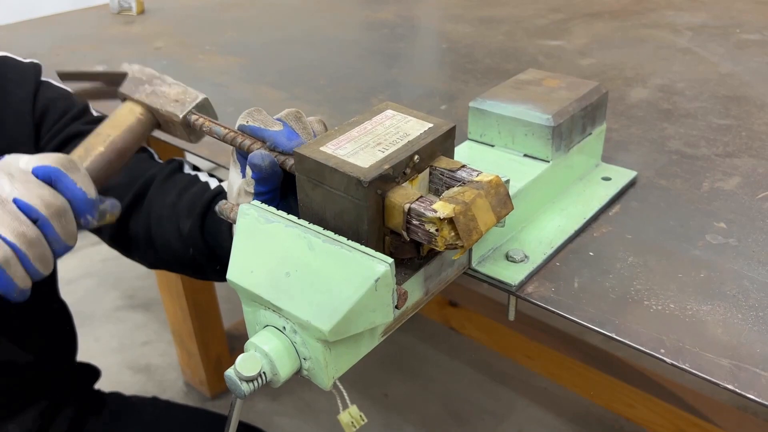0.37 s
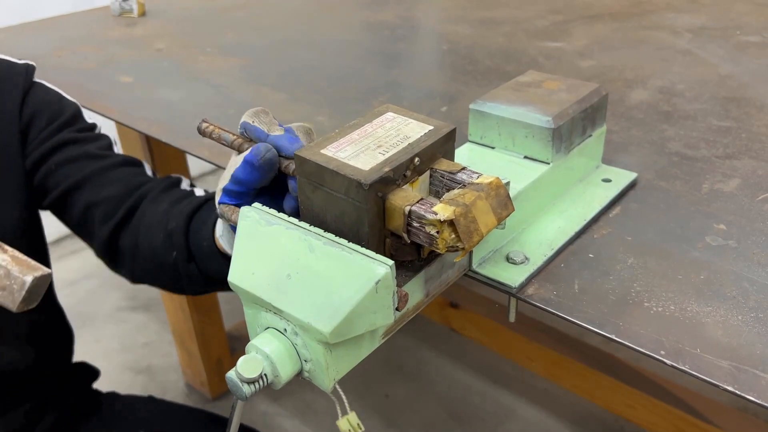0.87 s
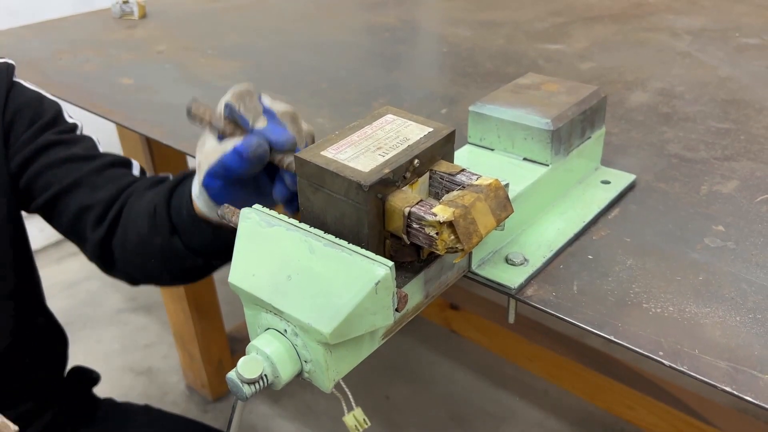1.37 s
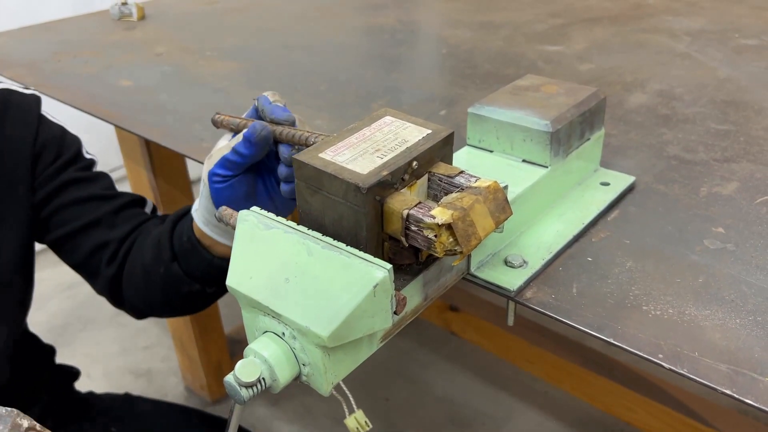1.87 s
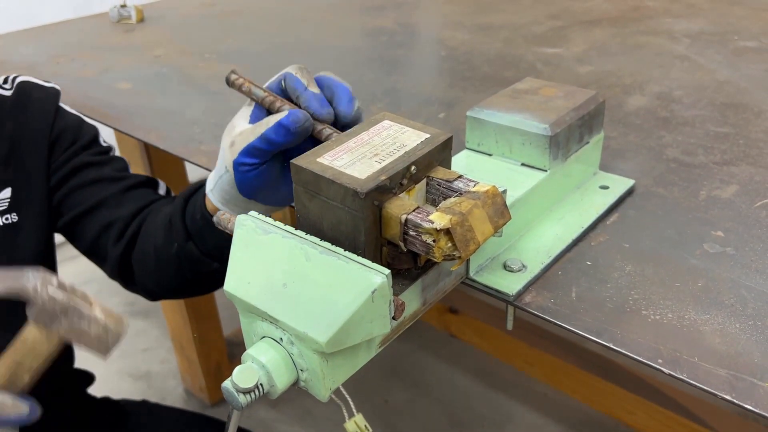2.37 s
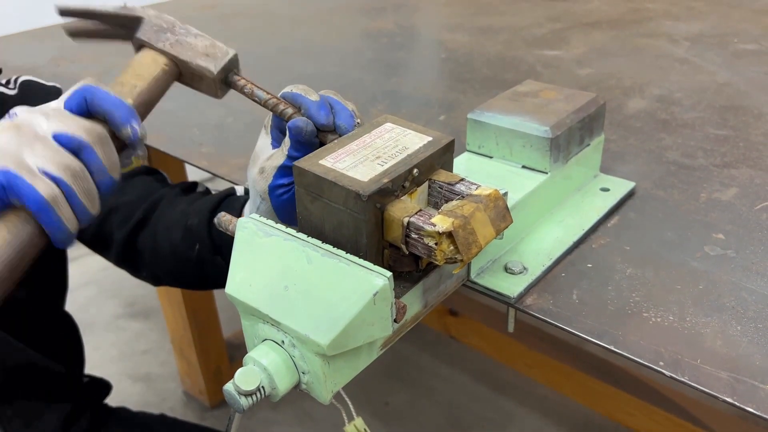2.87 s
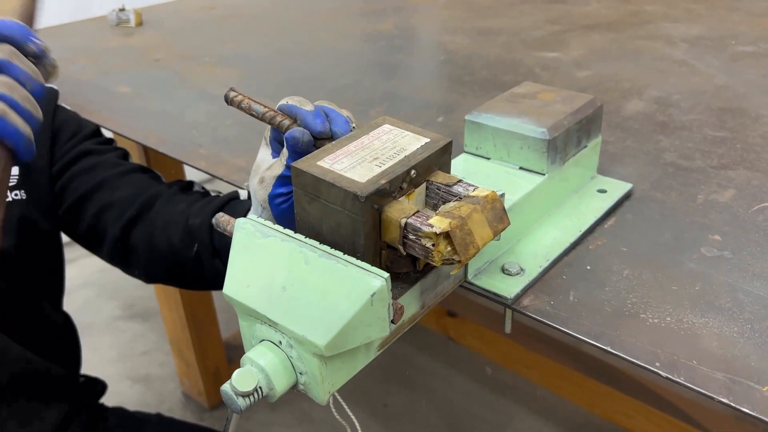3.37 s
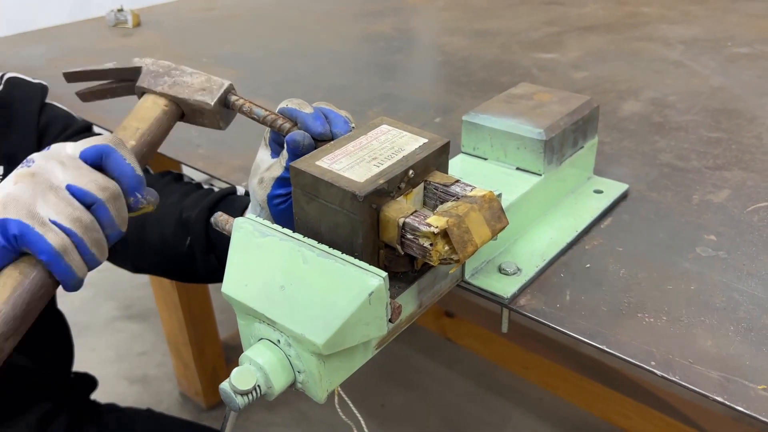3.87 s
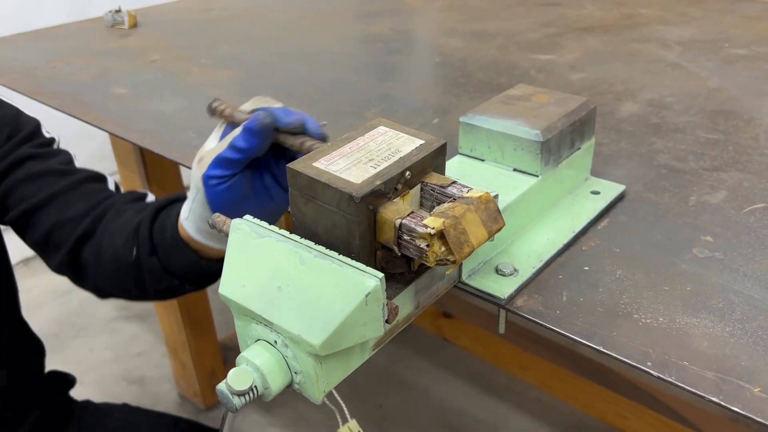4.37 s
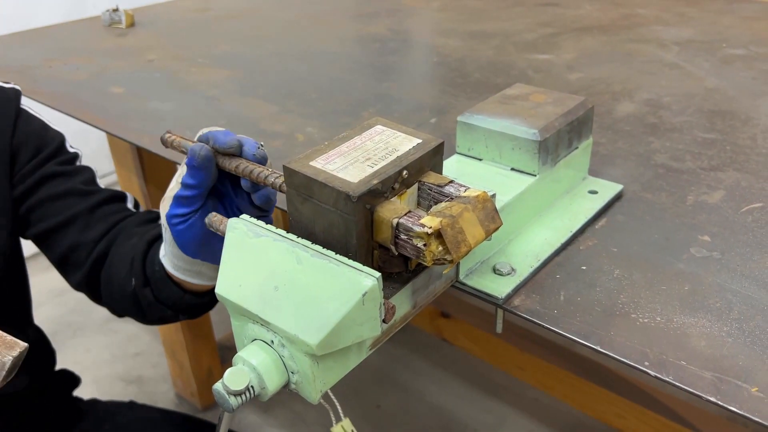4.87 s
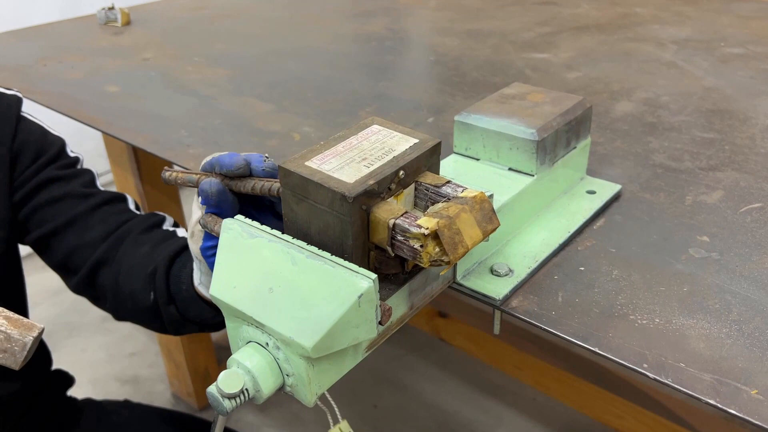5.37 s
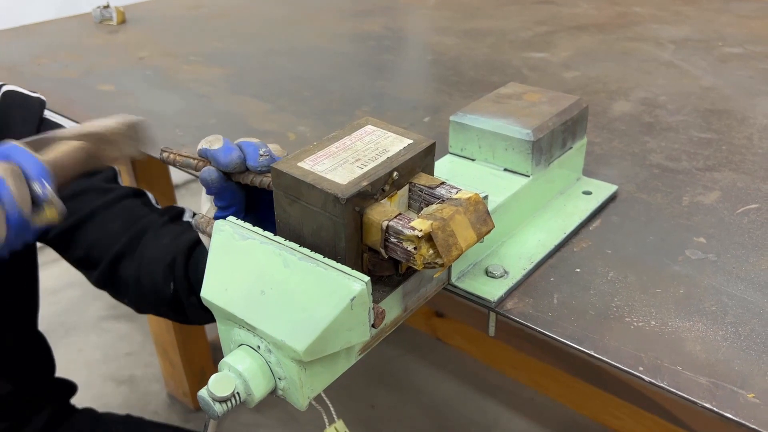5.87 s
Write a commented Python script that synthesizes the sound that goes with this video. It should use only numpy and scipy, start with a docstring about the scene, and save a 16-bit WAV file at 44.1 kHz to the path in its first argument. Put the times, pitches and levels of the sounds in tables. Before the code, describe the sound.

Sharp metallic hammer blows, five a second, ring through a workshop bench, pause for quiet handling knocks and rustles, then resume before one last strike.

```python
"""Hammer and steel rod at a vice

A hammer drives a steel rod into a part clamped in a vice on a sheet-steel bench, in bursts of quick blows.
Each blow cracks, rings rod and hammer head and booms through bench and workshop; between bursts a gloved
hand shifts the rod with small taps and rustles. Shaped noise makes hum, handling, boom, taps and cracks;
ringing noise bands make the rod, sines and fluttering noise the head. A wide stereo microphone with a
limiter listens."""
import sys
import numpy as np
from scipy import signal
from scipy.io import wavfile
from scipy.ndimage import uniform_filter1d

SR = 44100
rng = np.random.default_rng(int(sys.argv[2]) if len(sys.argv) > 2 else 0)


def master_out(mix):
    """Clip the mix to full scale and print it as 16-bit PCM to the path in sys.argv[1]."""
    frames = np.transpose(np.atleast_2d(mix))
    ceiling = np.clip(frames, -1, 1)
    pcm = np.round(ceiling * 32767).astype(np.int16)
    wavfile.write(sys.argv[1], SR, pcm)


def how_loud(loudness_db):
    """Turn decibels into a plain amplitude multiplier (0 dB gives 1, 20 dB gives 10)."""
    steps = np.asarray(loudness_db, float) / 20
    return 10 ** steps


N = 264159
LEAD = 8192   # samples run in before time zero
BAND_EDGES_HZ = 22 * 2 ** np.arange(0, 9.7, .4)
PRE_ECHO_S = 0.011   # growth time of the pre-echo, a noise smeared ahead of a hit


def rms_one(x):
    """Scales to unit rms."""
    return x / np.sqrt(np.mean(x ** 2) + 1e-20)


def at_hz(points, hz):
    """Reads a table along a log-frequency axis."""
    table_hz, values = np.transpose(points)
    return np.interp(np.log(hz), np.log(np.maximum(table_hz, 1)), values)


def colour(points, hz):
    """Gain of the band at hz, so that all bands of white noise together have unit rms."""
    centres_hz = np.sqrt(BAND_EDGES_HZ[1:] * BAND_EDGES_HZ[:-1])
    power = np.sum(how_loud(2 * at_hz(points, centres_hz)) * np.diff(BAND_EDGES_HZ)) / (SR / 2)
    return how_loud(at_hz(points, hz)) / np.sqrt(power)


def bands():
    """Yields (centre Hz, band of noise unrelated in the two channels, white level kept)."""
    white = rng.standard_normal((2, 2, N))
    for k, (low, high) in enumerate(zip(BAND_EDGES_HZ, BAND_EDGES_HZ[1:])):
        band = signal.butter(3, [low, high], "band", fs=SR, output="sos")
        yield np.sqrt(low * high), signal.sosfilt(band, white[k % 2])   # neighbours use different noise


def resonance(x, hz, width_hz):
    """Two-pole peak, gain 1 on top."""
    r = np.exp(-np.pi * width_hz / SR)
    poles = [1, -2 * r * np.cos(2 * np.pi * hz / SR), r * r]
    return signal.lfilter([(1 - r * r) / 2, 0, (r * r - 1) / 2], poles, x)


def twice_resonant(x, hz, width_hz):
    """Two equal peaks in series: steeper skirts."""
    return resonance(resonance(x, hz, width_hz), hz, width_hz)


def clicks(seconds, sizes):
    """One sample per event, with a run-in ahead of time zero."""
    train = np.full(N + LEAD, 1e-18)
    train[np.round(np.asarray(seconds) * SR).astype(int) + LEAD] = sizes
    return train


def dying(train, t60_s, rise_s):
    """Envelope that swells over the rise time and then dies away."""
    fall, rise = how_loud(-60 / (t60_s * SR)), np.exp(-1 / (rise_s * SR))
    return signal.lfilter([1 - rise], np.convolve([1, -fall], [1, -rise]), train)[LEAD:]


def pre_echo(train, level_db):
    """Envelope that grows towards each event and ends on it."""
    grow = signal.lfilter([1], [1, -np.exp(-1 / (PRE_ECHO_S * SR))], train[::-1])[::-1]
    return how_loud(level_db) * grow[LEAD:]


def patches(depth_db, per_s):
    """Gain that wanders at random; per_s up to 30."""
    knots = rng.standard_normal(round(N / SR * 30) + 2)
    return how_loud(depth_db * np.interp(np.arange(N) / SR * per_s, np.arange(len(knots)), knots))


def sides(db):
    """Left and right gain for a left-right difference."""
    return how_loud(np.array([db, -db]) / 2)


# spectrum of the workshop hum: (freq_hz, density_db_per_hz)
HUM = [(15, -30), (25, -3), (60, 3.5), (106, 4), (286, -11), (900, -13.5), (2630, -23), (4000, -33.5),
       (8800, -35.5), (11800, -47), (15000, -76.5)]


def workshop_hum(hz):
    """Steady low-heavy noise: its gain in the band at hz."""
    return colour(HUM, hz) * how_loud(-65)


# glove and sleeve moving between bursts: (time_s, shuffle_db, rustle_db)
HANDLING = [(0.95, -83.5, -98), (1.28, -80, -82), (1.504, -66.5, -75), (1.81, -73, -78), (2.07, -68.5, -90),
            (2.248, -64, -81), (2.636, -69, -80), (2.78, -69.5, -84.5), (4.4, -69, -92.5),
            (4.57, -61.5, -76.5), (4.652, -99, -93), (4.992, -100, -98), (5.106, -60, -76),
            (5.278, -61.5, -76), (5.41, -73, -63.5), (5.556, -64, -79.5), (5.82, -65.5, -83)]
# spectra of glove on steel: (freq_hz, density_db_per_hz)
SHUFFLE = [(90, -33), (200, 5.5), (400, -5), (800, -4), (1200, -16), (2300, -16), (3500, -33.5),
           (6000, -40)]
RUSTLE = [(1760, -29), (3000, 7), (4030, -5), (5320, -0.5), (8990, -8.5), (11300, -33), (15000, -40)]


def handling(hz):
    """Friction noise, dull shuffle and bright rustle, patchy in level: gains in the band at hz."""
    time_s, shuffle_db, rustle_db = np.transpose(HANDLING)
    t = np.arange(N) / SR
    shuffle = colour(SHUFFLE, hz) * how_loud(np.interp(t, time_s, shuffle_db)) * patches(1.4, 30)
    rustle = colour(RUSTLE, hz) * how_loud(np.interp(t, time_s, rustle_db)) * patches(1.9, 28)
    return shuffle, rustle


# rod touching the part: (start_s, knock_db, centre_hz, bright_db, left_right_db)
TAPS = [(1.42, -64, 108, -87, -4), (1.503, -69, 700, -68, 3), (1.729, -51, 1500, -99, 2),
        (2.055, -73, 1030, -87, -3), (2.188, -67.5, 2160, -90, 4.5), (2.399, -61, 780, -96.5, 1),
        (2.601, -59.5, 326, -78.5, 0), (4.519, -67.5, 670, -79, 3), (4.589, -68, 837, -78, 7),
        (4.938, -73, 388, -67.5, 0), (5.063, -72, 820, -65, 1), (5.08, -47.5, 805, -69, 2.5),
        (5.212, -42, 1960, -54, 2), (5.371, -58.5, 280, -73, 1.5), (5.407, -65, 268, -80, -1),
        (5.44, -78, 298, -67, 6), (5.599, -55.5, 277, -79, 6)]
# modes of part and vice under small knocks: (freq_hz, width_hz, level_db)
PART = [(280, 60, -10), (813, 110, -5), (1330, 120, -8), (1650, 110, 0), (2070, 160, -5), (2600, 160, -9),
        (4470, 80, -15), (6520, 90, -18), (7450, 80, -20), (8700, 110, -15)]


def taps():
    """A tick, then a short reverberant knock: the part's modes nearest the knock's centre speak loudest."""
    tap_t60_s, tick_t60_s, tick_at_s = 0.44, 0.0185, 0.002
    tick_from_hz, swell_cycles = 800, 2.7   # low knocks are soft: less tick, slower swell
    out, age = np.zeros((2, N)), np.arange(-2205, 17640) / SR
    after = age >= 0
    ahead = how_loud(-8.5) * np.exp(np.minimum(age, 0) / PRE_ECHO_S) * (age < 0)
    tail = after * how_loud(-60 * age / tap_t60_s) + ahead
    tick = after * how_loud(-60 * np.abs(age - tick_at_s) / tick_t60_s)
    for start_s, knock_db, centre_hz, bright_db, left_right_db in TAPS:
        noise = rng.standard_normal((2, len(age)))
        body = 0
        for hz, width_hz, level_db in PART:
            touch_db = rng.normal(0, 1.5)   # each touch favours other modes
            gain = how_loud(level_db + touch_db - 2.1 * np.log2(hz / centre_hz) ** 2)
            body = body + gain * resonance(resonance(noise, hz, width_hz), hz, 2.3 * width_hz)
        thud = rms_one(twice_resonant(noise, centre_hz, centre_hz * 0.5))
        knock = rms_one(rms_one(body) + thud)
        bright = rms_one(twice_resonant(noise, 7000, 4000))
        swell = 1 - 0.47 * after * np.exp(-np.abs(age) * centre_hz / swell_cycles)
        sound = how_loud(knock_db) * knock * (tail + centre_hz / tick_from_hz * tick) * swell
        sound = sound + how_loud(bright_db) * bright * (tail ** 1.9 + 0.83 * tick)
        at = round((start_s + age[0]) * SR)
        out[:, at:at + len(age)] += (sides(left_right_db)[:, None] * sound)[:, :N - at]
    return out


# hammer blows, also played by rod, head and cracks: (start_s, crack_db, boom_db, rod_main_db, head_ring_db)
BLOWS = [(-0.045, -10.5, -23, -23.5, -46), (0.1251, -2, -18, -20, -37), (0.3168, -3.5, -19, -21, -40.5),
         (0.5033, -0.5, -19, -19.5, -39.5), (0.7044, -8, -19.5, -20, -39),
         (2.8544, -5, -17.5, -21.5, -41.5), (3.0685, -9, -15.5, -23.5, -43.5),
         (3.267, -7.5, -18.5, -28.5, -40.5), (3.4751, -7.5, -18, -15, -50), (3.6719, -2, -16.5, -27.5, -57),
         (3.8847, -10.5, -18, -28, -53), (4.0751, 1.5, -16, -28.5, -48.5), (5.8864, -9, -17.5, -35, -35)]
# spectrum of bench and walls: (freq_hz, density_db_per_hz)
BOOM = [(15, -37), (28, -12), (60, -7), (112, 3), (190, -8.5), (335, -2.5), (500, -5), (900, -8),
        (1900, -14), (3500, -19.5), (6000, -16), (8400, -21), (10500, -31), (12500, -46), (16000, -52)]
# decay of bench and walls: (freq_hz, t60_s)
BOOM_T60 = [(40, 0.46), (110, 0.43), (280, 0.46), (740, 0.37), (1940, 0.41), (5120, 0.24), (11000, 0.33),
            (13000, .1), (16000, .08)]


def bench_boom(hz):
    """Bench and workshop answer each blow and die band by band: gain in the band at hz."""
    start_s, _, boom_db, *_ = np.transpose(BLOWS)
    luck_db = rng.normal(0, 1.0, len(start_s))   # no two blows shake the bench alike
    rise_s = 0.0017 + 2.3 / hz                   # the lows build up later
    train = clicks(start_s, how_loud(boom_db + luck_db))
    ahead = pre_echo(train, -18 + 10 * np.log10(hz / 1000))   # mostly treble
    return colour(BOOM, hz) * (dying(train, at_hz(BOOM_T60, hz), rise_s) + ahead)


def diffuse():
    """Hum, handling and boom add in power on noise unrelated in the two channels."""
    out = np.zeros((2, N))
    for hz, noise in bands():
        shuffle, rustle = handling(hz)
        steady = np.sqrt(workshop_hum(hz) ** 2 + shuffle ** 2 + rustle ** 2)
        boom = bench_boom(hz) * sides(-1.6)[:, None]
        out += noise * np.hypot(boom, steady)
    return out


# modes of the rod, damped by the hand: freq_hz
ROD_HZ = [2793, 5640, 5970, 7340, 7385, 7885, 8130, 8800, 10023, 10843, 11270, 11557, 11800, 12350, 13300,
          13900, 14780, 15250]
# the same modes in order: (level_db, t60_s)
ROD = [(-7, 0.25), (-8, .15), (-11, .15), (0, 0.29), (1, 0.13), (-7, 0.3), (-3, 0.04), (-4, 0.04),
       (-4, 0.22), (-7, .2), (-10, .2), (-8, 0.2), (-8, 0.2), (-10, 0.25), (-15, .12), (-10, .16),
       (-11, .16), (-9, .14)]


def rod():
    """The rod chatters in its hole and is heard through the room: noise keeps each mode ringing raggedly."""
    others_under_boom_db, loose_db, pause_s = -19, 9.5, 0.6
    start_s, _, boom_db, main_db, _ = np.transpose(BLOWS)
    loose = np.diff(start_s, prepend=start_s[0]) > pause_s   # first blow after a pause: more ring
    other_db = boom_db + others_under_boom_db + loose_db * loose
    out, noise = np.zeros((2, N)), rng.standard_normal((2, N))
    for hz, (level_db, t60_s) in zip(ROD_HZ, ROD):
        main = abs(hz - 7360) < 100
        ragged = rms_one(twice_resonant(noise, hz, 45))
        luck_db = rng.normal(0, 1 if main else 3, len(start_s))
        train = clicks(start_s, how_loud((main_db if main else other_db) + level_db + luck_db))
        out += ragged * (dying(train, t60_s, .003) + pre_echo(train, -25.13))
    return out


# modes of the free hammer head: freq_hz
HEAD_HZ = [2579, 5464, 5471, 9400, 13260]
# the same modes in order: (level_db, t60_s, left_right_db, lasting_flutter_0_to_1)
HEAD = [(-7.5, 0.4, -8, 0.7), (7, 1.285, 16.5, 0.47), (-13.5, 1, 1, 0.4), (-27, 1.3, -5, 0.6),
        (-36, 1.2, -2, .3)]


def hammer_head():
    """The head rings on after it leaves the rod, fluttering while it swings; the next contact stops the old ring."""
    swing_s = 0.23
    afterglow_db, afterglow_t60_s = -43.5, 3.48   # weak, slower second stage, set by the force of the blow
    out, t = np.zeros((2, N)), np.arange(N) / SR
    ends_s = [row[0] for row in BLOWS[1:]] + [N / SR]
    noise = rng.standard_normal((2, N))
    for hz, (level_db, t60_s, left_right_db, lasting) in zip(HEAD_HZ, HEAD):
        flutter = rms_one(twice_resonant(noise, hz, 39))
        phase = rng.uniform(0, 2 * np.pi, (2, 1))
        for (start_s, _, boom_db, _, ring_db), end_s in zip(BLOWS, ends_s):
            span = slice(max(0, round(start_s * SR)), round(end_s * SR))
            age = t[span] - start_s
            swinging = np.maximum(np.exp(-(age / swing_s) ** 2), lasting)
            ring = how_loud(ring_db - 60 * age / t60_s)
            afterglow = how_loud(boom_db + afterglow_db - 60 * age / afterglow_t60_s)
            tone = sides(left_right_db)[:, None] * np.sin(2 * np.pi * hz * age + phase)
            mix = (1 - swinging) * tone + 0.57 * swinging * flutter[:, span]
            out[:, span] += how_loud(level_db) * (ring + afterglow) * mix
    return out


def cracks():
    """Steel on steel: brief bright noise, its colour, left-right delay and level difference random per blow."""
    crack_s = 0.00065   # rise and fall
    out, age = np.zeros((2, N)), np.arange(600) / SR
    envelope = age / crack_s * np.exp(-age / crack_s)
    for start_s, crack_db, *_ in BLOWS[1:]:   # the first blow falls before time zero
        noise = rng.standard_normal((2, len(age)))
        high_luck, low_luck, delay_luck, pan_luck = rng.uniform(-1, 1, size=4)
        tone = resonance(noise, 8300 + 600 * high_luck, 420)
        tone = tone + 1.5 * resonance(noise, 5200 + 900 * low_luck, 1600)
        tone = tone + 0.16 * twice_resonant(noise, 5000, 5700)
        burst = how_loud(crack_db) * rms_one(tone) * envelope
        for side, (gain, sign) in enumerate(zip(sides(4.8 * pan_luck), (1, -1))):
            at = round((start_s + 0.001 + 0.00088 * sign * delay_luck) * SR)
            out[side, at:at + len(age)] += gain * burst[side]
    return out


def scene():
    """All sources at the two ports."""
    return diffuse() + taps() + rod() + hammer_head() + cracks()


def limiter(x, above_db=-30, cut_db_per_db=0.35, level_fall_db_s=60):
    """Loud moments turn the gain down at once; it comes back at a steady rate."""
    level_db = 10 * np.log10(uniform_filter1d(np.mean(x ** 2, axis=0), 220) + 1e-12)
    ramp_db = level_fall_db_s * np.arange(N) / SR
    held_db = np.maximum.accumulate(level_db + ramp_db) - ramp_db
    return x * how_loud(-cut_db_per_db * uniform_filter1d(np.maximum(held_db - above_db, 0), 100))


def roll_off(x):
    """The treble ends steeply here."""
    return signal.sosfilt(signal.butter(12, 16660, fs=SR, output="sos"), x)


def record(dry):
    """Limits the sound at the two ports and finishes it."""
    mix = limiter(dry)
    return roll_off(mix)


dry = scene()
out = record(dry)
master_out(out)
```